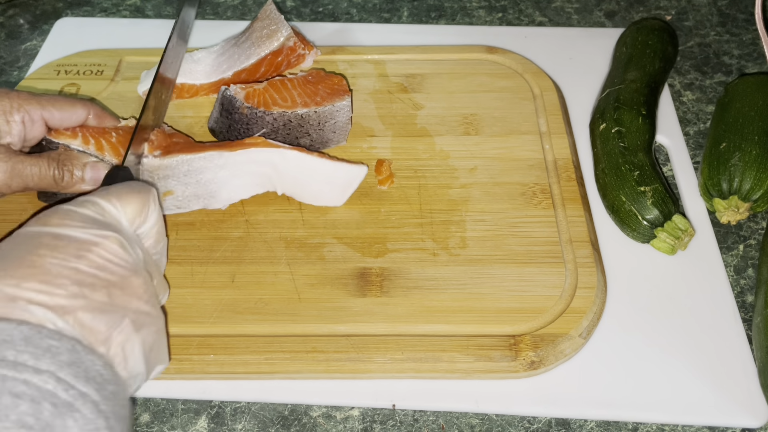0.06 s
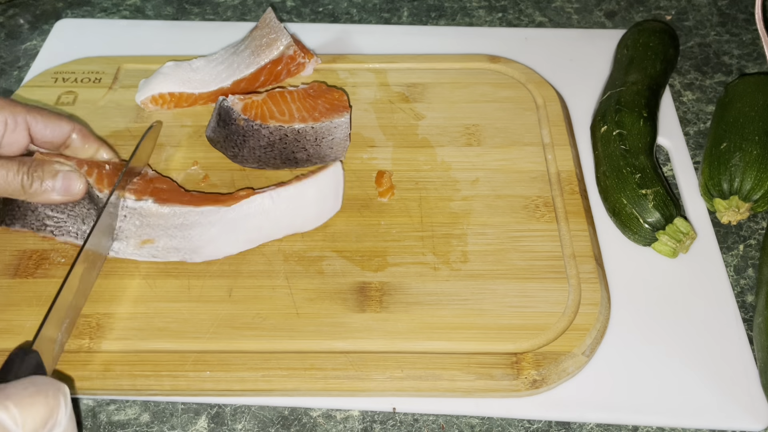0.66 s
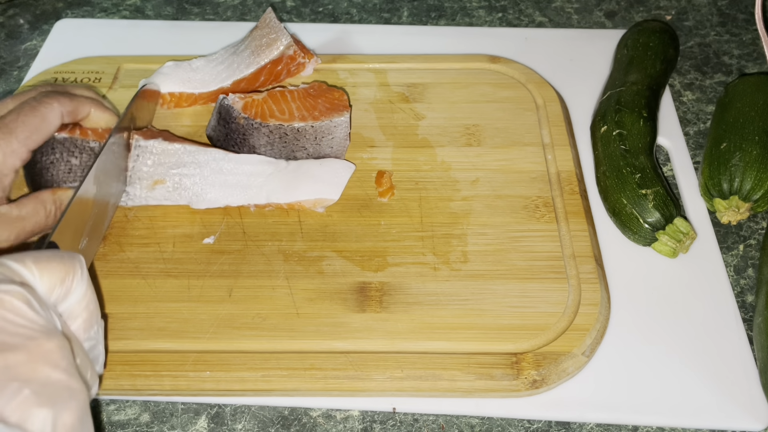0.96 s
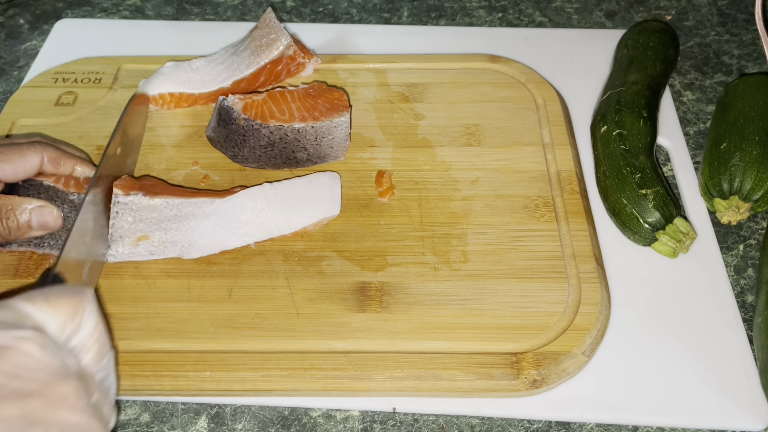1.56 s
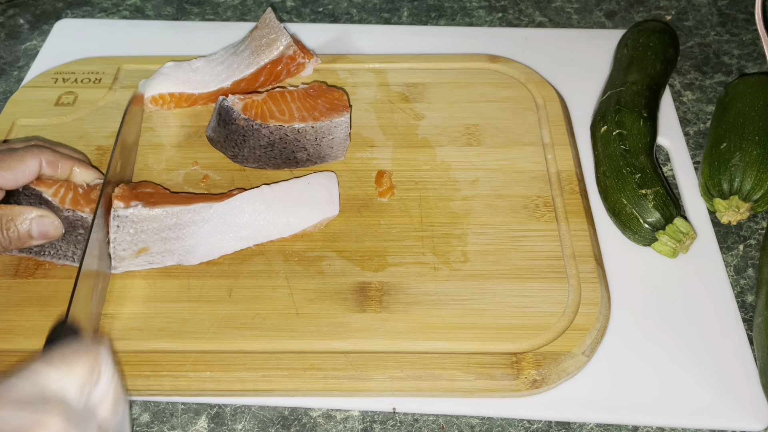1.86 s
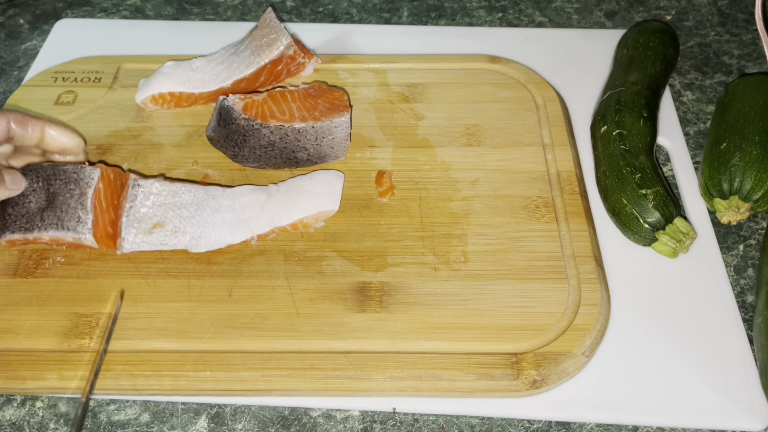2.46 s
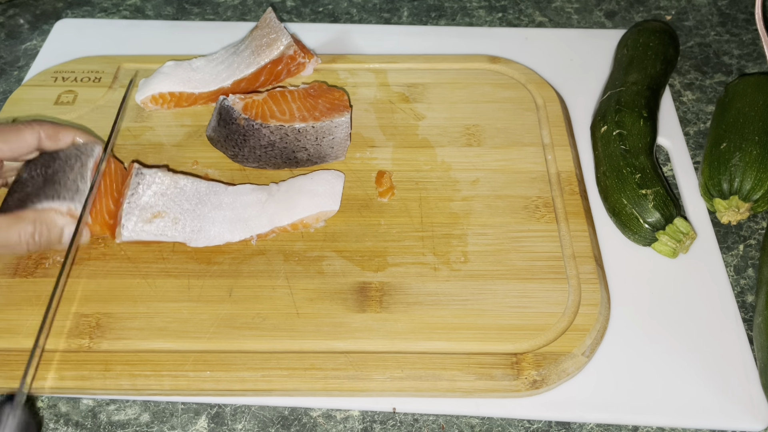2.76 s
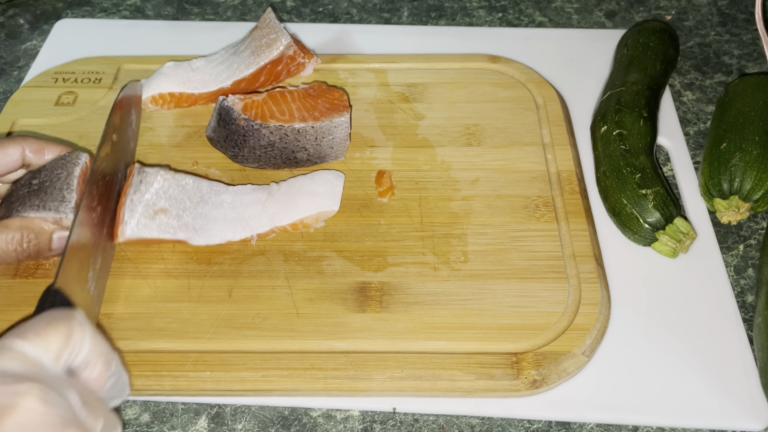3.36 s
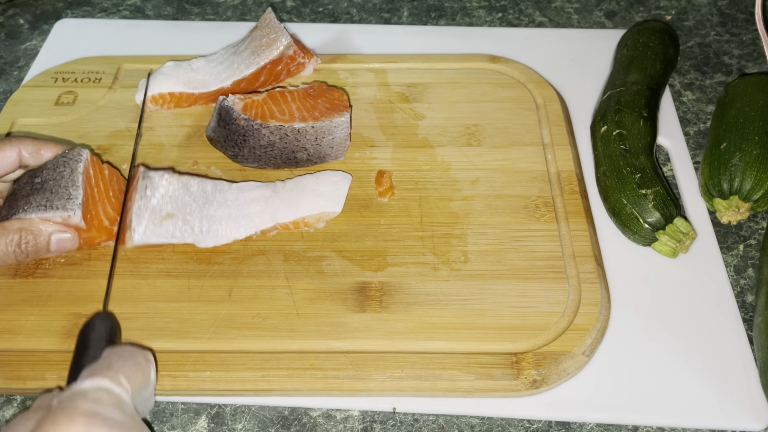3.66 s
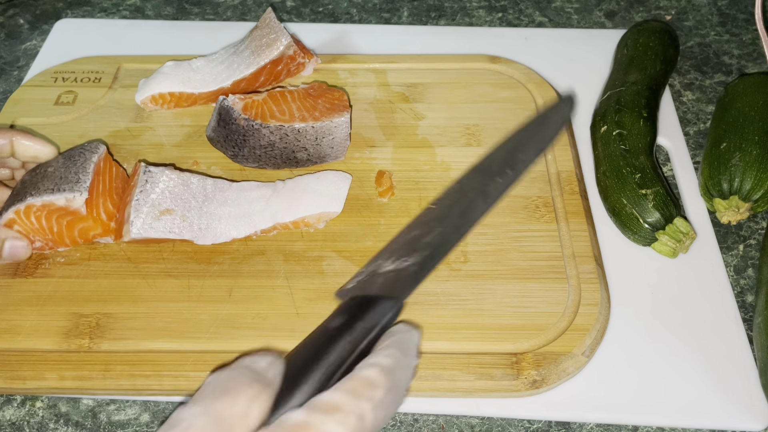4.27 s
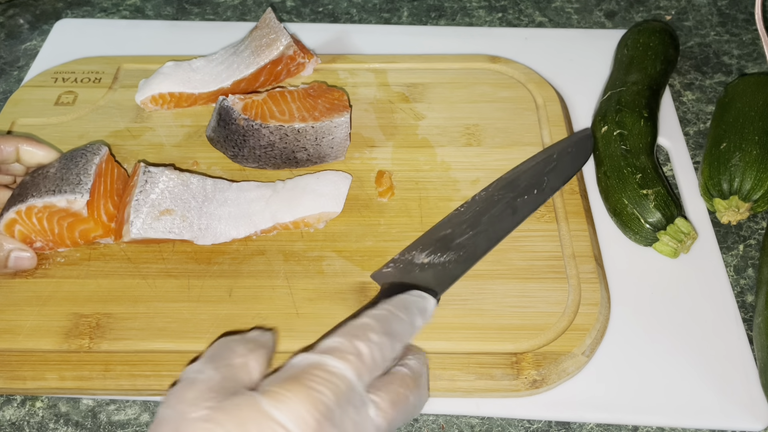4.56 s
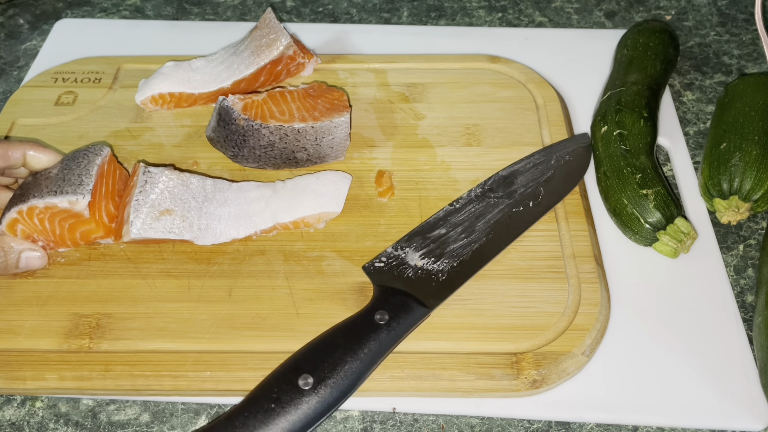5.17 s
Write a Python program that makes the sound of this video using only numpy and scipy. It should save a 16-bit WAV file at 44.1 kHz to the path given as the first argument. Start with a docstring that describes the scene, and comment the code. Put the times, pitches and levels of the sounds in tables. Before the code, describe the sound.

Close up in a small kitchen, a knife saws through a fish fillet in short strokes, with soft rasping, wet hiss and tiny snaps of skin. The blade knocks on a wooden cutting board at uneven intervals, loudest near the middle, the heavier blows thumping the counter. Finally the knife is laid down with two clacks, and a plastic glove faintly rubs and squeaks. An appliance hums quietly throughout.

```python
"""In a small kitchen, close up, a knife saws through a salmon fillet and knocks on a bamboo board.
Tiny slips make the blade rasp, wet flesh hisses and crackles, and the skin snaps as it parts.
Each knock rings the blade and the board, and the heavier ones thump the counter.
A plastic glove rubs and squeaks on the handle, and the knife is laid down. An appliance hums throughout."""
import sys
import numpy as np
from scipy import signal
from scipy.fft import rfft, irfft, next_fast_len
from scipy.io import wavfile
from scipy.ndimage import uniform_filter1d, map_coordinates

SR = 44100
rng = np.random.default_rng(int(sys.argv[2]) if len(sys.argv) > 2 else 0)


def unload_wav(signal):
    """Save mono or channel-first audio to the path in sys.argv[1] as 16-bit WAV at rate SR, clipped to [-1, 1]."""
    wavfile.write(
        sys.argv[1],
        SR,
        np.round(np.clip(np.atleast_2d(signal).T, -1, 1) * 32767).astype(np.int16),
    )


N = 239274


def amp(db):
    return 10 ** (np.asarray(db) / 20)

def unit(x):
    """x scaled to an average (rms) level of 1."""
    return x / np.sqrt(np.mean(x ** 2) + 1e-20)

def along(points, hz):
    """Read between (Hz, value) points on a log frequency axis."""
    freqs, values = np.transpose(points)
    return np.interp(np.log(hz + 1), np.log(freqs + 1), values)

def wobble(rate):
    """A smooth curve through rate random points a second."""
    return map_coordinates(rng.standard_normal(int(N * rate / SR) + 4), [np.arange(N) * rate / SR])

def filtered(x, response):
    """Multiply each frequency in x by response(hz)."""
    n = x.shape[-1]
    size = next_fast_len(n + SR // 4)
    return irfft(rfft(x, size) * response(np.fft.rfftfreq(size, 1 / SR)), size)[..., :n]

def coloured(x, tone):
    """x shaped by (Hz, dB) points, at level 1."""
    return unit(filtered(x, lambda hz: amp(along(tone, hz))))

def butter(x, kind, hz, order):
    """Keep the "low" or the "high" side of hz."""
    return signal.sosfilt(signal.butter(order, hz, kind, fs=SR, output="sos"), x)

def resonance(hz, centre_hz, width):
    """One ringing peak; width is a share of its centre."""
    damping = 1j * hz * width * centre_hz
    return damping / (centre_hz ** 2 - hz ** 2 + damping)

def add(track, s, sound):
    """Mix a sound into the track at s seconds."""
    part = track[round(s * SR):][:len(sound)]
    part += sound[:len(part)]

def grains(rate, spread_db):
    """Random ticks of uneven size, about rate a second."""
    ticks = (rng.random(N) < rate / SR) * rng.standard_normal(N)
    return unit(ticks * amp(spread_db * rng.standard_normal(N)))

def patchy(x, depth_db):
    """Make the tone of x keep shifting at random."""
    bands = signal.stft(x, nperseg=512)[2]
    patches = uniform_filter1d(rng.standard_normal(bands.shape), size=12, axis=0)
    patches = uniform_filter1d(patches, size=14, axis=1)
    return unit(signal.istft(bands * amp(depth_db * unit(patches)), nperseg=512)[1][:N])

def ring(notes, t, scatter_db):
    """A struck object's notes, at new strengths each blow; t60 is the seconds to fade by 60 dB."""
    return sum((-1) ** k * amp(db + scatter_db * rng.standard_normal() - 60 * t / t60)
               * np.sin(2 * np.pi * hz * t) for k, (hz, db, t60) in enumerate(notes))

def favoured(notes, spot_hz, boost_db, octaves=0.19):
    """The spot that is struck brings out the notes near spot_hz."""
    return [(hz, db + boost_db * np.exp(-(np.log2(hz / spot_hz) / octaves) ** 2), t60)
            for hz, db, t60 in notes]


# The motor's rumble and the mains hum. Each row: frequency in Hz, level in dB.
MOTOR_TONE = [(15, -50.5), (25, -29), (50, -3), (91, 3), (122, -5.5), (135, -7.5), (146, -15), (284, -11),
              (356, -18), (659, -30.5), (1200, -47.5), (1560, -75), (2640, -120)]
MAINS_HUM = [(60.2, -60), (119.8, -52.5)]

def appliance():
    """A motor rumbles, hums and thinly whines over faint room air."""
    t = np.arange(N) / SR
    rumble = coloured(rng.standard_normal(N), MOTOR_TONE)
    air_tone = [(25, -17.5), (120, 9), (300, -3.5), (800, -12), (3000, -26), (14000, -47)]
    air = coloured(rng.standard_normal((2, N)), air_tone)
    hum = sum(amp(db + wobble(7.5)) * np.sqrt(2) * np.sin(2 * np.pi * hz * (t + 0.00029 * wobble(14)))
              for hz, db in MAINS_HUM)
    whine = unit(filtered(rng.standard_normal(N), lambda hz: resonance(hz, 4760, width=0.0074) ** 2))
    return amp(-52.5) * rumble + amp(-58.5) * air + hum + amp(-74) * whine


# Pushes and pulls of the knife. Each row: start, length and rise time in seconds,
# levels of drag, rasp and wet hiss in dB, blade pitch in Hz.
STROKES = [(0.0, 0.049, 0.00055, -51, -64.5, -52, 2360), (0.097, 0.21, 0.026, -38.5, -47.5, -50, 2330),
           (0.715, 0.33, 0.0044, -56.5, -64, -60.5, 2780), (1.066, 0.17, 0.012, -45, -56, -61, 2700),
           (1.335, 0.064, 0.0037, -65, -56.5, -58, 1840), (1.39, 0.25, 0.024, -86, -67.5, -108, 1830),
           (1.797, 0.12, 0.039, -35.5, -51, -48.5, 2110), (1.907, 0.51, 0.072, -51.5, -62.5, -58.5, 2100),
           (2.566, 0.11, 0.0066, -68.5, -71.5, -56.5, 2190), (2.846, 0.52, 0.0015, -65, -62.5, -67.5, 2035),
           (3.358, 0.084, 0.012, -45, -56.5, -49.5, 2450), (3.567, 0.038, 0.0097, -42.5, -63, -48, 1900)]
# The blade dragging on the board and rasping in the skin. Each row: frequency in Hz, level in dB.
DRAG_TONE = [(200, 1), (500, 4), (720, -11.5), (880, -0.5), (1010, 5), (1160, -2), (1330, -0.5),
             (1600, -13), (3000, -28.5)]
RASP_TONE = [(1200, -24.5), (1780, -1), (2600, -6.5), (3100, -12), (4500, -14.5), (9000, -37)]

def sawing():
    """The edge catches, then slides in tiny slips that shake the board and the blade."""
    drag_gain, rasp_gain, _ = stroke_gains(stop_t60=0.036)
    slips = coloured(grains(rate=3500, spread_db=-1.5), RASP_TONE)
    rasp, t = np.zeros(N), np.arange(SR // 10) / SR
    starts = [round(row[0] * SR) for row in STROKES]
    for (s, _, rise_s, _, rasp_db, _, blade_hz), start, end in zip(STROKES, starts, starts[1:] + [N]):
        catch = amp(rasp_db + 12.5 - 60 * t / 0.033)
        add(rasp_gain, s, catch * np.exp(-rise_s / 0.0036))  # slow starts barely catch
        ringing = filtered(slips[start:end], lambda hz: 1 + 2 * resonance(hz, blade_hz, width=0.2))
        add(rasp, s, unit(ringing))
    drag = patchy(coloured(grains(rate=820, spread_db=-1.5), DRAG_TONE), depth_db=4)
    return (drag_gain * drag + rasp_gain * rasp) * amp(-2 + 0.73 * wobble(37))

def stroke_gains(stop_t60, ease_db=7.5):
    """Loudness of drag, rasp and hiss: a stroke rises, eases as the flesh parts, then stops."""
    gains, t = np.zeros((3, N)), np.arange(SR) / SR
    for s, length, rise_s, *levels_db, _ in STROKES:
        rise = 1 - np.exp(-t / rise_s)
        fall = amp(-ease_db * t / length - 60 * np.maximum(t - length, 0) / stop_t60)
        for gain, db in zip(gains, levels_db):
            add(gain, s, amp(db) * rise * fall)
    return gains


# The hiss of rubbing flesh or glove. Each row: frequency in Hz, level in dB.
RUB_TONE = [(1000, -11.5), (2500, -7), (3800, -4.5), (5100, -2.5), (7000, -3.5), (9000, -3), (12500, -7),
            (15500, 0.5)]

def wet_flesh():
    """Wet flesh hisses and ticks on the sliding blade, lingering after each stroke."""
    *_, sliding = stroke_gains(stop_t60=0.13)
    hiss = coloured(rng.standard_normal(N) + 0.29 * grains(rate=98, spread_db=4.5), RUB_TONE)
    return sliding * amp(2.5 + 0.74 * wobble(26)) * patchy(hiss, depth_db=1.5)


# Shifts of grip. Each row: loudest moment in seconds, length in seconds, level in dB.
GRIPS = [(1.667, 0.72, -65.5), (2.41, 0.15, -52.5), (3.733, 0.31, -57.5), (4.015, 0.25, -59),
         (4.306, 0.41, -53.5), (4.581, 0.23, -49), (4.797, 0.14, -54), (5.176, 0.38, -64.5)]

def glove_rub(rest_db=-72, fall_db=14):
    """The plastic glove hisses faintly and swells each time the grip shifts."""
    t = np.arange(N) / SR
    swells = sum(amp(db - fall_db * (2 * (t - s) / length) ** 2) for s, length, db in GRIPS)
    hiss = unit(butter(coloured(rng.standard_normal(N), RUB_TONE), "low", 10584, order=1))
    return (amp(rest_db) + swells) * amp(-1.77 + 2.9 * wobble(24)) * patchy(hiss, depth_db=2.5)


# The knife lands and bounces while cutting, then is laid down and tapped by the fingers. Each row:
# start in seconds, edge level in dB, treble limit in Hz, blade pitch in Hz, board level in dB.
CONTACTS = [(0.1956, -18.5, 4540, 2280, -14), (0.205, -10, 4280, 2400, -12.5),
            (0.2097, -7.5, 1200, 690, -17), (0.2153, -40.5, 692, 448, -13), (0.2226, -21, 3100, 980, -22.5),
            (0.2543, -25, 3040, 1330, -47.5), (0.9867, -21, 4500, 2200, -44),
            (0.9878, -21, 1900, 1100, -33), (0.993, -26, 2400, 750, -34), (1.0015, -29, 2600, 2200, -35),
            (1.012, -33, 2000, 720, -36), (2.156, -35, 2170, 1100, -45), (2.208, -19.5, 4580, 1900, -35),
            (2.2119, -0.5, 3050, 2700, -24), (2.2124, -3, 1350, 1020, -15.5), (2.2152, -4, 2200, 1620, -28),
            (2.2198, -11, 2700, 2300, -18.5), (2.306, -36.5, 2795, 1956, -47.5),
            (3.452, -38.5, 4000, 2018, -39), (3.54, -36, 2170, 500, -27), (3.546, -42.5, 457, 391.5, -23.5),
            (3.5556, -51.5, 460, 400.5, -25.5), (4.3426, -9, 6600, 3900, -27),
            (4.3439, -8.5, 2700, 1460, -29), (4.3444, -10, 1040, 880, -23), (4.362, -49, 700, 463, -24),
            (4.375, -24.5, 2220, 1420, -49.5), (4.396, -23.5, 1950, 900, -32.5),
            (4.629, -13.5, 2840, 1900, -23), (4.6312, -13.5, 1270, 700, -24.5),
            (4.6409, -28, 4960, 2380, -28), (4.649, -32, 4250, 2970, -29), (4.826, -38.5, 1620, 1345, -56),
            (4.874, -43, 1306, 950, -68), (4.985, -44.5, 1606, 1300, -57.5), (5.164, -34, 3000, 1685, -50)]
# Where the knife lands. Each row: time in seconds, board pitch brought out there in Hz.
SPOTS = [(0.2, 342), (1.0, 440), (2.2, 407.8), (3.55, 345.4), (4.35, 420), (4.63, 442)]

def knocks():
    """Tip, edge and heel of the knife meet the board in turn."""
    out = np.zeros(N)
    for s, *blow in CONTACTS:
        add(out, s, contact(*blow, spot_hz=np.interp(s, *np.transpose(SPOTS))))
    return out


# The notes of blade and board. Each row: pitch in Hz, level in dB, seconds to fade by 60 dB.
BLADE_NOTES = [(835, -15, 0.04), (940, -10, 0.03), (1010, -12, 0.045), (1228, -14, 0.04),
               (1375, -14, 0.045), (1632, -13, 0.04), (2075, -18, 0.03), (2250, -12, 0.028),
               (2610, -13, 0.025), (2850, -16, 0.018), (3130, -15, 0.022), (3450, -21, 0.015),
               (4120, -18, .02), (4480, -17, 0.04)]
BOARD_NOTES = [(165, -15, .045), (205, -20, .04), (329, -9, .085), (380, 3, .009), (432, -10, .075),
               (465, -14, .05), (586, -15, .05), (684, -16, .045), (790, -14, .045)]
# The dry crack of a knock. Each row: frequency in Hz, level in dB.
CRACK_TONE = [(80, -36), (300, -12), (900, 4), (3000, -2), (6000, 5), (12000, -2), (16000, -2.5)]

def contact(edge_db, sharp_hz, blade_hz, board_db, spot_hz):
    """One knock rings the blade and the board; a soft one has no treble."""
    t = np.arange(SR // 4) / SR
    # place and pressure shift the notes a little
    blade_shift, board_shift = 1 + np.array([0.016, 0.0029]) * rng.uniform(-0.872, 1, 2)
    crack = coloured(rng.standard_normal(len(t)), CRACK_TONE) * amp(-1.53 - 60 * t / 0.017)
    edge = ring(BLADE_NOTES, blade_shift * t, scatter_db=-0.5) * amp(-8) + crack
    edge = filtered(edge, lambda hz: 1 + 1.8 * resonance(hz, blade_hz, width=0.22))
    edge = butter(edge, "low", sharp_hz, order=4)
    edge = butter(edge, "high", 0.29 * blade_hz, order=2)  # a thin blade gives little bass
    tick = crack * amp(-17.5 - 60 * t / 0.062) * min(sharp_hz / 4000, 1.6) ** 4  # steel touches first
    board = ring(favoured(BOARD_NOTES, spot_hz, boost_db=4.5), board_shift * t, scatter_db=6)
    board = butter(board, "low", min(sharp_hz, 665), order=4)  # wet wood cushions the blow
    board *= 1 - np.exp(-t / 0.00077)
    return amp(edge_db) * (edge + tick) + amp(board_db) * board


# Pushes on the counter. Each row: start in seconds, level in dB, pitch brought out in Hz.
THUMPS = [(0.2092, -14, 106), (0.2422, -24.5, 61), (0.986, -42, 108), (1.999, -31.5, 98), (2.16, -25.5, 85),
          (2.216, -26.5, 105), (3.543, -26.5, 108), (3.567, -33.5, 62), (4.346, -44, 123), (4.397, -37, 70),
          (4.632, -28, 70)]
# The counter's notes. Each row: pitch in Hz, level in dB, seconds to fade by 60 dB.
COUNTER_NOTES = [(60, -4, .18), (80, -12, .11), (104, -3, .065), (130, -8, .055)]

def thumps(rise_s=0.0041):
    """The heavy counter gives way slowly under a blow or the hand, with no deep bass."""
    out, t = np.zeros(N), np.arange(SR // 4) / SR
    for s, db, spot_hz in THUMPS:
        push = ring(favoured(COUNTER_NOTES, spot_hz, boost_db=10.5), t, scatter_db=2)
        push *= 1 - np.exp(-t / rise_s)
        add(out, s, amp(db) * butter(push, "high", 43, order=4))
    return out


# Skin and fibres snapping under the edge, and the edge catching as some strokes start. Each row: start in
# seconds, level in dB, pitch in Hz.
SNAPS = [(0.3582, -37, 6750), (0.5428, -39.5, 12100), (0.715, -47, 1200), (0.9, -42, 13700),
         (0.969, -38, 12500), (1.052, -57, 9000), (1.075, -36, 13400), (1.0834, -38, 13400),
         (1.1, -33, 12100), (1.124, -36, 6400), (1.137, -37, 5950), (1.2944, -42, 13000),
         (1.301, -43, 4440), (1.342, -41, 2300), (2.2552, -41.5, 6170), (2.589, -34, 5430),
         (2.707, -41, 13330), (2.7446, -44, 12800), (2.85, -44.5, 2400), (2.9, -48, 8100),
         (3.3672, -27.5, 4000), (3.379, -21, 12200), (3.381, -24, 12500), (3.583, -40, 1400)]

def snaps(octaves=0.97, click_t60=0.0018, peel_t60=0.05):
    """Skin parts or the edge catches with a crisp click, then sticky flesh peels off the steel."""
    out, t = np.zeros(N), np.arange(SR // 20) / SR
    for s, db, pitch_hz in SNAPS:
        noise = rng.standard_normal((2, len(t)))
        noise[1] **= 3  # cubing turns hiss into ticks
        click, peel = filtered(noise, lambda hz: 1 / (1 + (np.log2((hz + 1) / pitch_hz) / octaves) ** 2))
        click = unit(click) * amp(-60 * t / click_t60)
        peel = unit(peel) * amp(-18 - 60 * t / peel_t60)
        add(out, s, amp(db - 0.5) * (click + peel))
    return out


# Runs of tearing fibres. Each row: start in seconds, length in seconds, level in dB.
TEARS = [(0.728, 0.45, -62), (1.075, 0.085, -60.5), (1.828, 0.4, -59.5), (2.773, 0.64, -69),
         (3.377, 0.03, -49.5)]
# The tone of their ticks. Each row: frequency in Hz, level in dB.
CRACKLE_TONE = [(1500, -19.5), (5000, -1.5), (12000, -8), (16000, 1)]

def crackle():
    """Wet fibres part in dense runs of tiny ticks."""
    gain = np.zeros(N)
    for s, length, db in TEARS:
        add(gain, s, np.full(int(length * SR), amp(db)))
    return gain * coloured(grains(rate=280, spread_db=-0.5), CRACKLE_TONE)


# Glove slips. Each row: start and length in seconds, first and last pitch in Hz, level in dB.
SQUEAKS = [(3.853, 0.035, 4845, 4870, -58.5), (4.987, 0.158, 577, 525, -56.5),
           (5.239, 0.077, 944, 700, -55), (5.291, 0.086, 602, 569, -55)]

def squeaks(roughness=0.33, scuff_db=-11.5):
    """The glove sticks and slips unevenly on the handle, which scuffs the board."""
    out, scuff = np.zeros(N), coloured(grains(rate=530, spread_db=0.5), DRAG_TONE)
    for s, length, start_hz, end_hz, db in SQUEAKS:
        n = int(length * SR)
        progress = np.linspace(0, 1, n)
        cycles = np.cumsum(start_hz * (end_hz / start_hz) ** progress) / SR
        slips = (wobble(roughness * start_hz) + 1j * wobble(roughness * start_hz))[:n]
        squeak = unit(np.real(slips * np.exp(2j * np.pi * cycles)))
        swell = (1 - np.exp(-progress / 0.05)) * np.sqrt(1 - progress)
        add(out, s, amp(db + 3) * swell * (squeak + amp(scuff_db) * scuff[round(s * SR):][:n]))
    return out


# The room's echo. Each row: frequency in Hz, seconds to fade by 60 dB.
ECHO_TIMES = [(100, 0.22), (500, 0.22), (2000, 0.2), (5000, 0.16), (12000, 0.05)]

def kitchen_echo(x):
    """Worktop and walls give a short echo, drawn afresh at random about every third of a second."""
    out = np.zeros((2, N))
    side_tone = [(80, -15), (400, 0.5), (2000, 2.5), (5000, 4.5), (8000, -6.5)]
    for piece in np.array_split(np.arange(N), 16):
        hz, t, noise = signal.stft(rng.standard_normal((2, SR // 3)), SR, nperseg=256)
        decay = amp(-60 * t / along(ECHO_TIMES, hz)[:, None]) * (1 - np.exp(-t / 0.0017))
        mid, side = signal.istft(noise * decay, SR, nperseg=256)[1]
        side = filtered(side, lambda hz: amp(along(side_tone, hz)))
        for channel, tail in zip(out, [mid + side, mid - side]):
            add(channel, piece[0] / SR, signal.fftconvolve(x[piece], tail / np.linalg.norm(tail)))
    return out


# Left against right. Each row: frequency in Hz, how much louder the left is in dB.
LEFT_LOUDER = [(200, 0), (1200, -1), (2400, 4), (4400, 4), (7000, .3), (12000, 0)]
# Each row: frequency in Hz, how far the left wave is ahead in radians.
LEFT_AHEAD = [(300, 0), (900, .6), (1500, -.3), (1900, -1.7), (2400, -.3), (3100, .9), (4000, -.2),
              (5300, .3), (6500, -.6), (7900, -3.1), (8600, -3.2), (10600, -6.1), (12200, -6.4),
              (14800, -9.4)]

def stereo(x):
    """The microphone's two openings hear the board with different level and timing."""
    half = np.array([[0.5], [-0.5]])
    return filtered(x, lambda hz: amp(half * along(LEFT_LOUDER, hz))
                    * np.exp(1j * half * along(LEFT_AHEAD, hz)))


def scene():
    """The close sounds at the board, their echo and the appliance behind them."""
    close = knocks() + thumps() + snaps() + crackle() + sawing() + wet_flesh() + glove_rub() + squeaks()
    return stereo(close + amp(-9.5) * kitchen_echo(close)) + appliance()

def record(dry, top_hz=16400):
    """Cut off the very highest treble."""
    return filtered(dry, lambda hz: 1 / (1 + (hz / top_hz) ** 120))


dry = scene()
out = record(dry)
unload_wav(out)
```